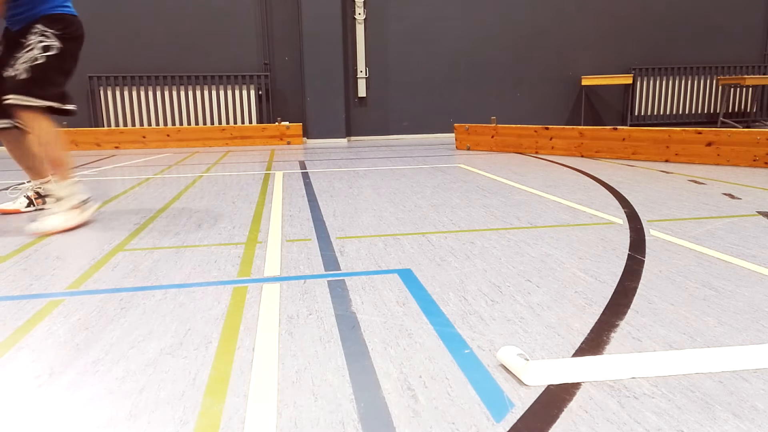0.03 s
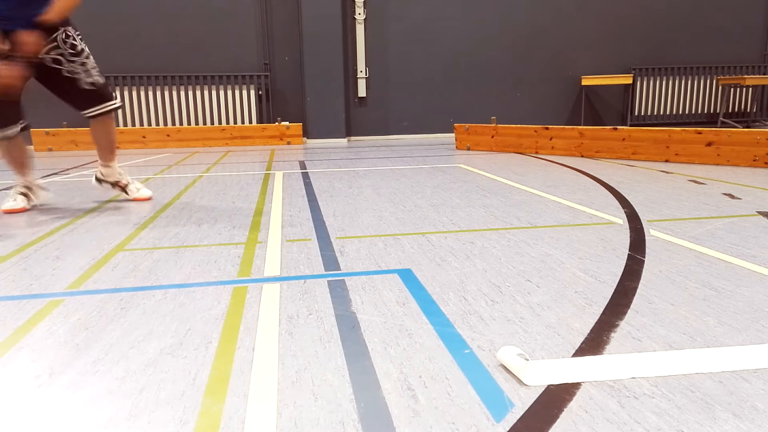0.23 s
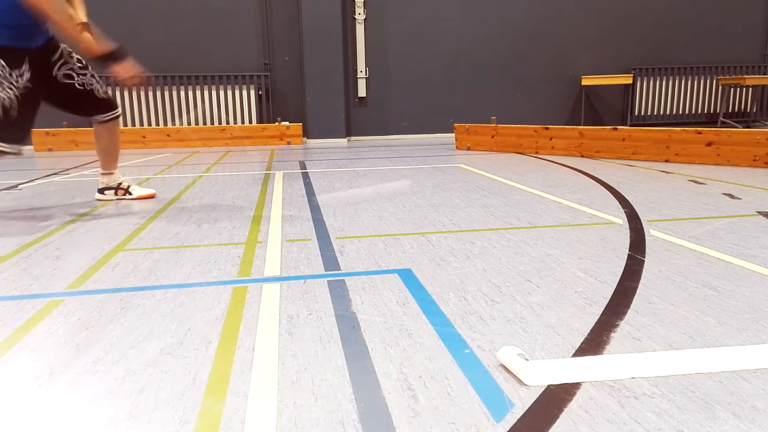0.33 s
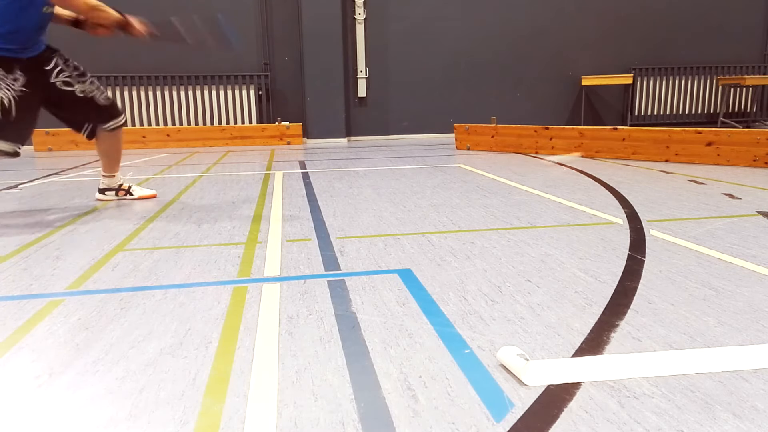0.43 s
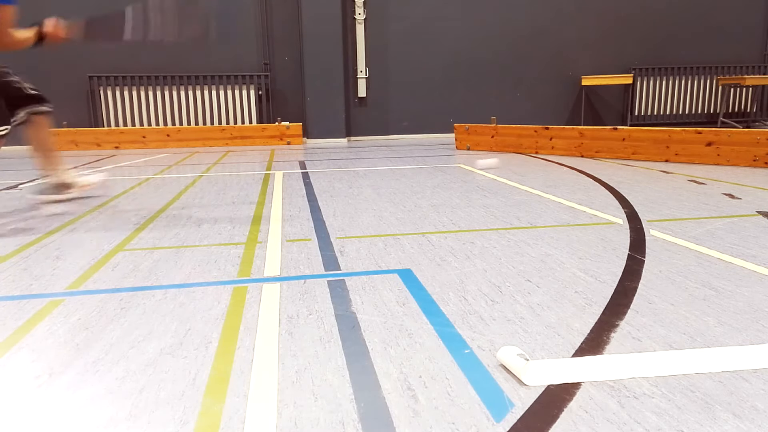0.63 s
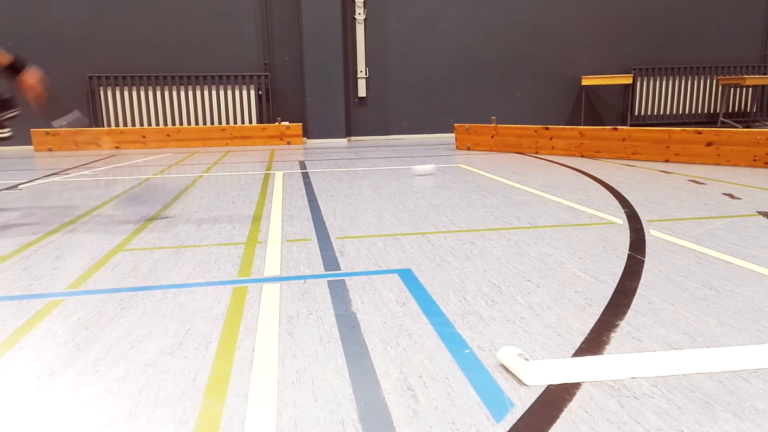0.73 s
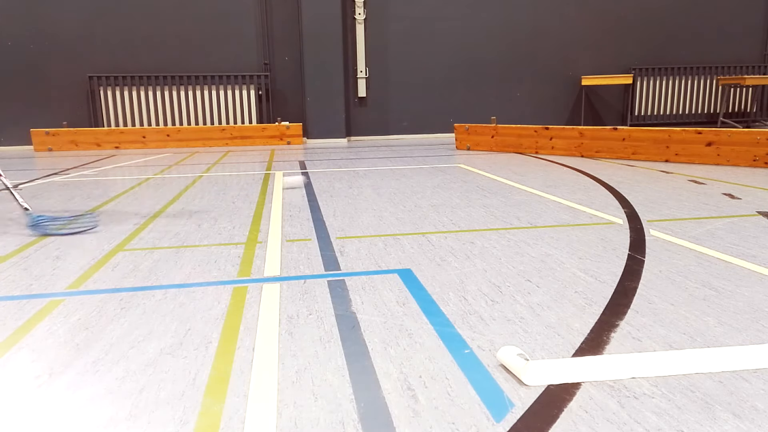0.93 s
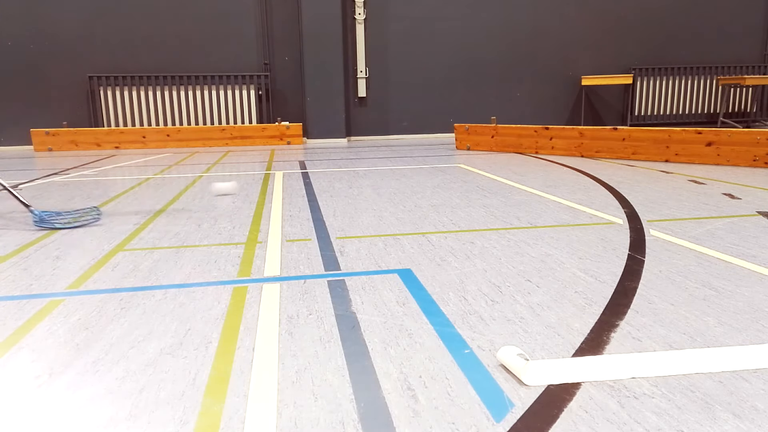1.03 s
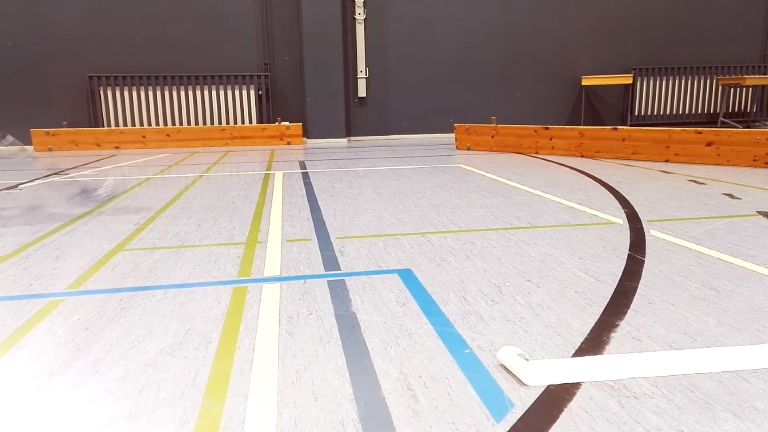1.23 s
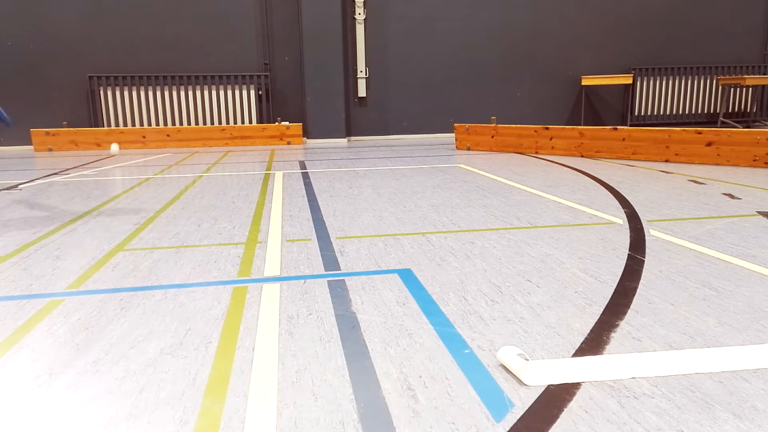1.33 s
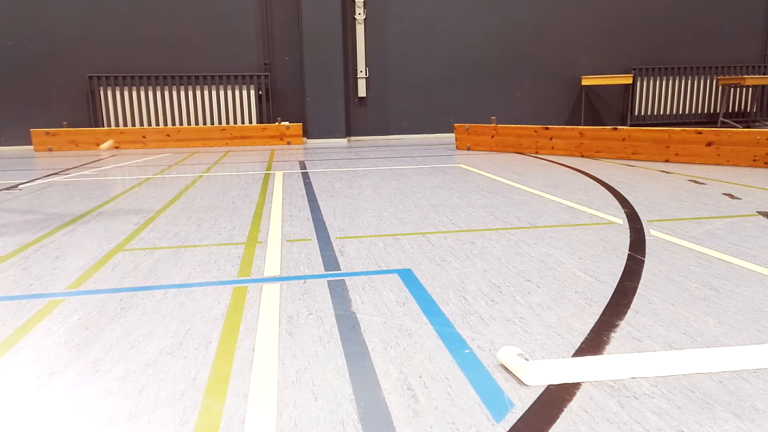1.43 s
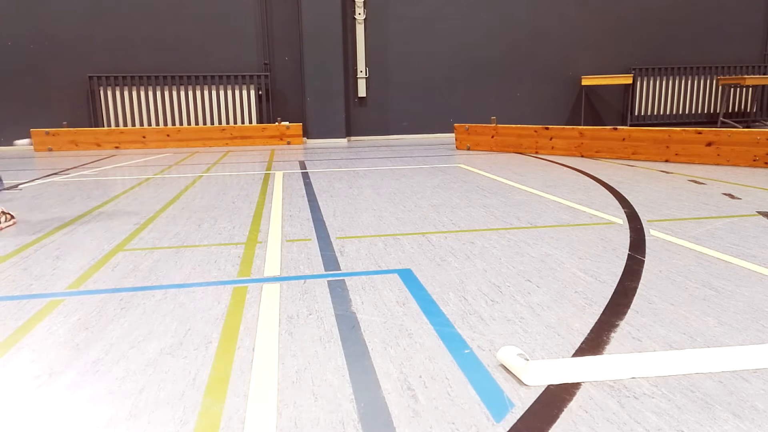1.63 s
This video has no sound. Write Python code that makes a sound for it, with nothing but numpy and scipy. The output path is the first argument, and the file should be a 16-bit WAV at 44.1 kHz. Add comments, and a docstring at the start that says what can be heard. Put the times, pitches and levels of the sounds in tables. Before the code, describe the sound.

Sharp clacks of a plastic ball hitting boards and a stick in an echoing hall.

```python
"""Floorball in a sports hall

A player sweeps the hollow plastic ball into a wooden rink board and turns on a squeaking shoe, feet
booming in the sprung floor. The ball bounces back, clacks against the blade and knocks on a second
board. The hall rings after every blow, heard from floor level by a spaced pair of microphones."""
import sys
import numpy as np
from scipy import signal
from scipy.fft import rfft, irfft
from scipy.io import wavfile
from scipy.ndimage import uniform_filter1d

SR = 44100
rng = np.random.default_rng(int(sys.argv[2]) if len(sys.argv) > 2 else 0)


def unload_wav(signal):
    """Save mono or channel-first audio to the path in sys.argv[1] as 16-bit WAV at rate SR, clipped to [-1, 1]."""
    wavfile.write(
        sys.argv[1],
        SR,
        np.round(np.clip(np.atleast_2d(signal).T, -1, 1) * 32767).astype(np.int16),
    )


N = 74970


def amp(db):
    return 10 ** (np.asarray(db) / 20)


def unit(x):
    """Scales to energy 1."""
    return x / np.sqrt(np.sum(x ** 2) + 1e-20)


def seconds(size):
    return np.arange(size) / SR


def read(curve, hz):
    """Reads a curve on a log-frequency axis."""
    f, value = np.transpose(curve)
    return np.interp(np.log(hz + 1), np.log(f + 1), value)


def colour(x, eq, size=4096):
    """Minimum-phase EQ: nothing rings ahead of an attack."""
    log_gain = np.log(amp(read(eq, abs(np.fft.fftfreq(size, 1 / SR)))))
    taps = np.fft.ifft(np.exp(np.conj(signal.hilbert(log_gain)))).real[:size // 2]
    return signal.fftconvolve(x, taps)[:len(x)]


def place(mix, onset, sound, lead_ms):
    """Adds a sound at both microphones, the left one earlier by lead_ms."""
    start = round(onset * SR)
    for channel, at in zip(mix, (start, start + round(lead_ms * SR / 1000))):
        piece = sound[max(-at, 0):]
        part = channel[max(at, 0):][:len(piece)]
        part += piece[:len(part)]


def burst(eq, decay_s, push, size=6000):
    """A contact heard from one side: a sharp push and dying chatter, evened out to the EQ curve."""
    chatter = unit(rng.choice([-1., 1.], size) * np.exp(-seconds(size) / decay_s))
    chatter[0] = -push
    hz = np.fft.rfftfreq(size, 1 / SR)
    ripple_db = 10 * np.log10(uniform_filter1d(abs(rfft(chatter)) ** 2, size=20))
    return unit(colour(chatter, np.transpose([hz, read(eq, hz) - ripple_db])))


def pulse(eq, size=3000):
    """A contact averaged over all directions: a clean click for the hall send."""
    return unit(colour(signal.unit_impulse(size), eq))


def ring(modes, tune=1, size=12000):
    """A struck body rings as a sum of dying sines."""
    t = seconds(size)
    partials = (amp(db - 60 * t / t60) * np.sin(2 * np.pi * hz * tune * t) for hz, db, t60 in modes)
    return unit(sum(partials))


# Stereo image of the room, narrow lows and wide highs: f/Hz, left-right coherence
COHERENCE = [(130, 0.98), (290, 0.88), (640, 0.56), (1400, 0)]

def diffuse(size):
    """Noise arriving from all sides, alike at the two microphones only in the bass."""
    left, other = rfft(rng.standard_normal((2, size)))
    alike = read(COHERENCE, np.fft.rfftfreq(size, 1 / SR))
    return irfft([left, alike * left + np.sqrt(1 - alike ** 2) * other], size)


# EQ of the rumbling room tone and of the ring left by earlier play: f/Hz, level/dB
AIR_EQ = [(20, 18.5), (85, 18), (180, -29), (500, -4.5), (1500, -36), (4000, -16.5), (12000, -23)]
LINGER_EQ = [(60, -22), (170, -0.5), (450, 1.5), (900, -5), (2000, -14.5), (7000, -14.5), (12000, -14.5)]

def room_tone(eq, db):
    """A bed of diffuse hall noise; db is a level or a fade."""
    noise = np.array([colour(channel, eq) for channel in diffuse(N)])
    return amp(db) * noise / noise.std()


# Blade and sole slides: t/s, swell/s, fade/s, level/dB
SLIDE_CUES = [(-0.03, 0.071, 0.087, -45.5), (0.10, 0.14, 0.0094, -31.5), (0.421, 0.016, 0.041, -36.5),
              (1.13, 0.034, 0.0019, -31)]
# Friction hiss EQ: f/Hz, level/dB
SLIDE_EQ = [(150, -15), (800, 1.5), (1600, -7), (3000, -16.5), (7000, -10), (9000, 3), (11500, 0),
            (14000, -7.5)]
GRAIN_DB, PLAYER_LEAD_MS = 3, .27

def slides():
    """Grainy friction swells as a slide over the floor speeds up, then dies away."""
    out, t = np.zeros((2, N)), seconds(SR // 2)
    for onset, swell, fade, db in SLIDE_CUES:
        grain = uniform_filter1d(rng.standard_normal(len(t)), size=60)
        hiss = colour(rng.standard_normal(len(t)) * amp(GRAIN_DB * grain / grain.std()), SLIDE_EQ)
        envelope = np.minimum(t / swell, 1) * np.exp(-np.maximum(t - swell, 0) / fade)
        place(out, onset, amp(db) * envelope * hiss / hiss.std(), PLAYER_LEAD_MS)
    return out


# Shoe chirps: t/s, length/s, level/dB, f/Hz, octave against the tone/dB
SQUEAK_CUES = [(0.193, .008, -30, 5750, 0), (0.248, .009, -30.5, 5600, -2),
               (0.4527, .0105, -11.5, 5870, -9), (0.462, .012, -22, 5930, -6)]
SQUEAK_SAG, SQUEAK_JITTER = .028, .005  # fractions of the pitch
OCTAVE_SEND_DB = 3.5  # the octave beams up into the hall more than along the floor

def squeaks():
    """A rubber sole sticks and slips: a tone that sags as the foot slows. Returns direct and send."""
    out, send = np.zeros((2, 2, N))
    for onset, length, db, hz, octave_db in SQUEAK_CUES:
        progress = np.arange(0, length, 1 / SR) / length
        waver = uniform_filter1d(rng.standard_normal(len(progress)), size=25)
        pitch = hz * (1 + SQUEAK_SAG * (.5 - progress) + SQUEAK_JITTER * waver / waver.std())
        phase = 2 * np.pi * np.cumsum(pitch) / SR
        swell = amp(db) * np.sqrt(2) * np.sin(np.pi * progress ** .5) ** .8
        tone = swell * np.sin(phase)
        octave = swell * amp(octave_db) * np.sin(2 * phase)
        place(out, onset, tone + octave, PLAYER_LEAD_MS)
        place(send, onset, tone + amp(OCTAVE_SEND_DB) * octave, PLAYER_LEAD_MS)
    return out, send


# Footfalls: t/s, level/dB, floor note f/Hz
STEP_CUES = [(0.232, -14, 500), (0.43, -2, 150), (0.562, -6, 320), (0.625, -4, 148), (0.68, -2, 148),
             (0.763, -6, 390), (1.51, -12, 275), (1.56, -8, 175)]
# Dull thud EQ, for floor and boards: f/Hz, level/dB
THUD_EQ = [(50, -30.5), (105, -32), (150, 0), (290, 2.5), (420, -1), (620, -1.5), (900, -8), (2000, -17),
           (6000, -77.5)]
STEP_T60_S, STEP_RISE_S, THUD_DECAY_S = .24, .004, .012

def steps():
    """Each footfall thuds and booms in the sprung floor, with a soft attack."""
    out, t = np.zeros((2, N)), seconds(12000)
    attack = 1 - np.exp(-t / STEP_RISE_S)
    for onset, db, hz in STEP_CUES:
        boom = ring([(hz, 0, STEP_T60_S)])
        thud = amp(-1.5) * burst(THUD_EQ, THUD_DECAY_S, push=0, size=len(t))
        place(out, onset, amp(db) * unit((boom + thud) * attack), PLAYER_LEAD_MS)
    return out


# Floor bounces: t/s, tick level/dB, shell level/dB, cavity level/dB, cavity f/Hz
BOUNCE_CUES = [(0.3453, -14, -41, -42, 870), (0.698, -5.5, -15.5, -3, 1034), (0.792, -6, -14.5, -11.5, 910),
               (1.5372, -21.5, -23.5, -21, 966), (1.6179, -10.5, -36.5, -15, 980)]
# Clacks on the blade: the same columns, then blade level/dB
CLACK_CUES = [(1.1302, 5, -9, -2, 846, -30), (1.168, 11, 5, -1.5, 974, -15), (1.1732, 0, -18, -4, 950, -15)]
# Bright plastic tick EQ: f/Hz, level/dB
TICK_EQ = [(100, -68), (400, -20), (1500, -13.5), (4000, -8.5), (7000, -1.5), (8700, 1), (11000, 4.5),
           (14000, -2.5)]
# Ping of the shell and ring of the blade: f/Hz, level/dB, T60/s
SHELL_MODES = [(5990, 13.5, 0.0071), (5300, 1, 0.014)]
BLADE_MODES = [(3230, 1, 0.11)]
# Hollow note of the air in the ball: ratio to cavity f, level/dB, T60/s
CAVITY_MODES = [(.76, 1, 0.014), (1, 12, 0.018), (1.5, 0, 0.012)]
# The ball's pan path: t/s, lead of the left microphone/ms
BALL_PAN = [(0.34, .2), (0.41, -.1), (0.7, .17), (1.13, .2)]

def ball():
    """The ball ticks, its shell and air ring, and so does a struck blade. Returns direct and send."""
    out, send = np.zeros((2, 2, N))
    for onset, tick_db, shell_db, cavity_db, cavity_hz, *blade_db in BOUNCE_CUES + CLACK_CUES:
        lead_ms = np.interp(onset, *np.transpose(BALL_PAN))
        body = amp(shell_db) * ring(SHELL_MODES) + amp(cavity_db) * ring(CAVITY_MODES, cavity_hz)
        blade = amp(blade_db[0]) * ring(BLADE_MODES) if blade_db else 0
        place(out, onset, amp(tick_db) * burst(TICK_EQ, decay_s=.0008, push=.38), lead_ms)
        place(out, onset, body + blade, lead_ms)
        place(send, onset, amp(tick_db) * pulse(TICK_EQ), lead_ms)
        place(send, onset, amp(-4.5) * body + blade, lead_ms)
    return out, send


# Early reflections off the floor, then the nearest boards: delay/s, level/dB
REFLECTIONS = [(.001, -7), (.0155, -17), (.026, -21)]
SMEAR_S = .0042

def scatter(x):
    """Nearby surfaces return each contact as a few brief, smeared echoes."""
    spray = unit(diffuse(N) * np.exp(-seconds(N) / SMEAR_S))
    echoes = sum(amp(db) * np.roll(spray, round(delay * SR), axis=1) for delay, db in REFLECTIONS)
    return signal.fftconvolve(x, echoes, axes=1)[:, :N]


# Board hits and their rattle: t/s, tick, crack, thud, ring and boom level/dB, boom f/Hz
BOARD_CUES = [(0.4106, -7, 10.5, 9, 5.5, 1, 160), (0.4287, -24, -8.5, 2, -6, -3, 249),
              (1.3652, -1, -6.5, 4, -4.5, 1, 190.7), (1.395, -21, -17, -0.5, -26, 1, 246),
              (1.4031, -11, -12, -3.5, -27, -17, 272)]
# Woody crack EQ: f/Hz, level/dB
CRACK_EQ = [(100, -55), (800, -5.5), (1280, 9.5), (2400, -3.5), (4300, -2), (6500, -5), (13000, -15.5)]
# Ring of the wooden panel: f/Hz, level/dB, T60/s
BOARD_MODES = [(248.6, -26, 0.27), (323.7, 0.5, 0.21), (464, -21, 0.071), (673, 1, 0.36), (1054, -2, 0.19),
               (1206, 14.5, 0.042), (1327, 5.5, 0.053), (1760, -10, 0.27)]
CRACK_DECAY_S, BOOM_T60_S = .0014, .16

def boards():
    """The ball cracks on a rink board, which thuds, rings and rattles. Returns direct and send."""
    out, send = np.zeros((2, 2, N))
    for onset, tick_db, crack_db, thud_db, ring_db, boom_db, boom_hz in BOARD_CUES:
        lead_ms = np.interp(onset, *np.transpose(BALL_PAN))
        crack = amp(crack_db) * (burst(CRACK_EQ, CRACK_DECAY_S, push=.7) + amp(-3) * rattle())
        tick = amp(tick_db) * burst(TICK_EQ, CRACK_DECAY_S, push=.7)
        thud = amp(thud_db) * burst(THUD_EQ, THUD_DECAY_S, push=.5)
        boom = amp(boom_db) * ring([(boom_hz, 0, BOOM_T60_S)])
        wood = amp(ring_db) * ring(BOARD_MODES) + boom
        place(out, onset, tick + crack + thud, lead_ms)
        place(out, onset, -wood, lead_ms)  # same polarity as the push
        for db, eq in (tick_db, TICK_EQ), (crack_db, CRACK_EQ), (thud_db, THUD_EQ):
            place(send, onset, amp(db) * pulse(eq), lead_ms)
        place(send, onset, wood, lead_ms)
    return out, send


def rattle(clicks_per_s=2000, decay_s=.007, size=6000):
    """The loose board chatters on after a hit: a quickly dying train of small cracks."""
    clicks = rng.standard_normal(size) * (rng.random(size) < clicks_per_s / SR)
    return unit(colour(clicks * np.exp(-seconds(size) / decay_s), CRACK_EQ))


# Reverb time: f/Hz, T60/s
HALL_DECAY = [(150, 3), (1000, 2.04), (2500, 2.14), (4500, 1.6), (6000, .9), (9000, 1.3), (13000, .65)]
# Reverb return EQ: f/Hz, level/dB
HALL_EQ = [(100, -7.5), (200, -7), (400, 0), (1000, -1), (2500, 0.5), (4500, -10.5), (6000, -9),
           (8500, -13), (13500, -14)]
PREDELAY_S, BUILD_S = .005, .004

def hall(send):
    """The hall answers with a diffuse tail that builds quickly and dies soonest in the treble."""
    hz, t, bands = signal.stft(diffuse(N), SR, nperseg=512)
    t60 = read(HALL_DECAY, hz)[:, None]
    decay = amp(read(HALL_EQ, hz)[:, None] - 60 * t / t60)
    equal_energy = np.sqrt(2 * np.log(1000) / (t60 * SR))  # long bands come out no louder
    tail = signal.istft(bands * decay * equal_energy, SR, nperseg=512)[1][:, :N]
    build = 1 - np.exp(-np.maximum(seconds(N) - PREDELAY_S, 0) / BUILD_S)
    return signal.fftconvolve(send, tail * build, axes=1)[:, :N]


def scene():
    """Mixes ball and player with the hall reverb, over the room tone."""
    knocks, knock_send = boards()
    taps, tap_send = ball()
    echoes = scatter(taps)
    soles, sole_send = squeaks()
    feet, scrapes = steps(), slides()
    ball_send = amp(.42) * knock_send + amp(2) * tap_send
    player_send = amp(-8) * sole_send + amp(1) * feet + amp(-.5) * scrapes
    reverb = hall(ball_send + player_send)
    air = room_tone(AIR_EQ, db=-41.5)
    lingering = room_tone(LINGER_EQ, db=-41.5 - 21.5 * seconds(N))
    return knocks + taps + echoes + soles + feet + scrapes + reverb + air + lingering


# Microphone response: f/Hz, level/dB
MIC_EQ = [(85, -15), (145, 0), (14200, 0), (15300, -42)]
LOWPASS_HZ = 15900

def record(dry):
    """The microphones thin bass and top; loud peaks are smoothly rounded off; then a low-pass."""
    heard = np.array([colour(channel, MIC_EQ) for channel in dry])
    limited = .95 * heard / (1 + heard ** 6) ** (1 / 6)
    lowpass = signal.firwin(255, LOWPASS_HZ, window=("kaiser", 9), fs=SR)
    return signal.oaconvolve(limited, lowpass[None], "same")


dry = scene()
out = record(dry)
unload_wav(out)
```